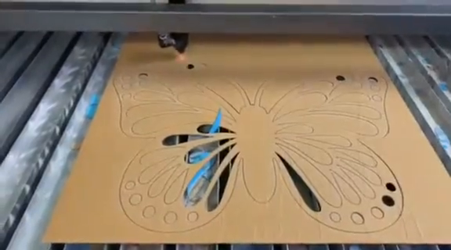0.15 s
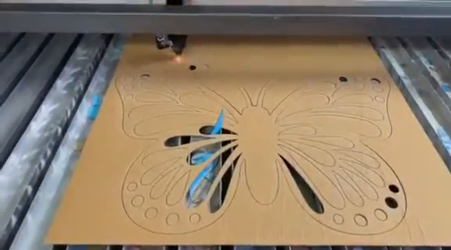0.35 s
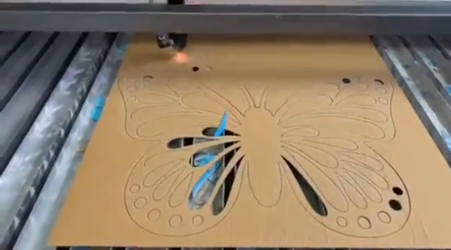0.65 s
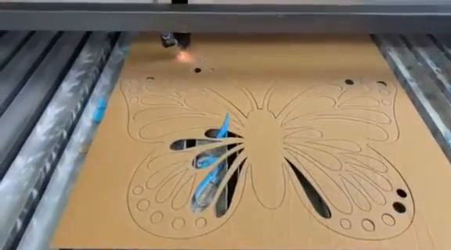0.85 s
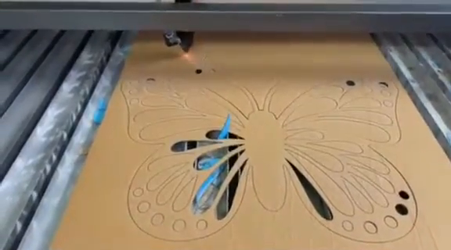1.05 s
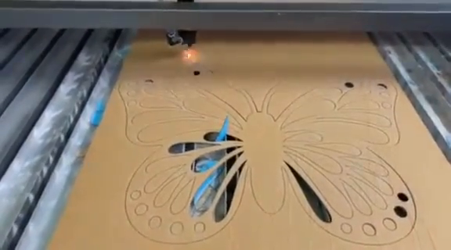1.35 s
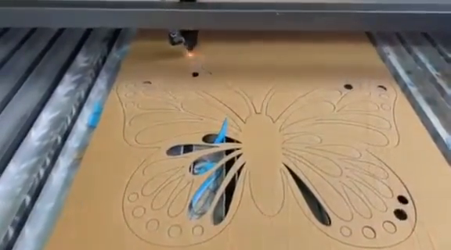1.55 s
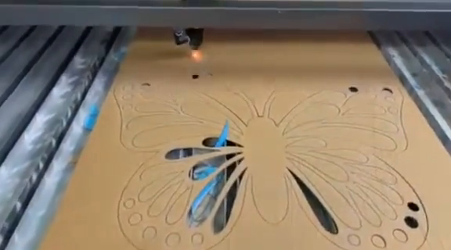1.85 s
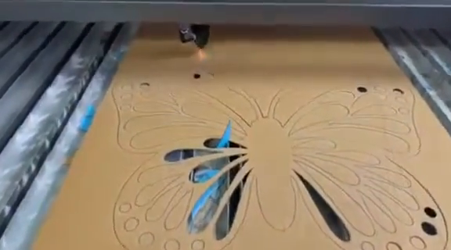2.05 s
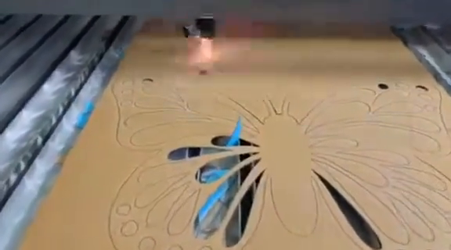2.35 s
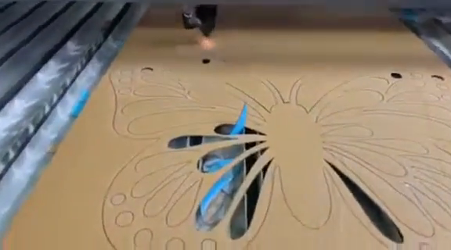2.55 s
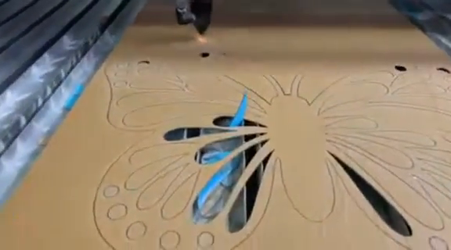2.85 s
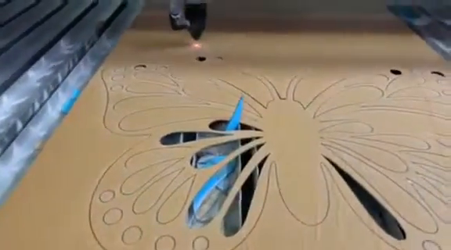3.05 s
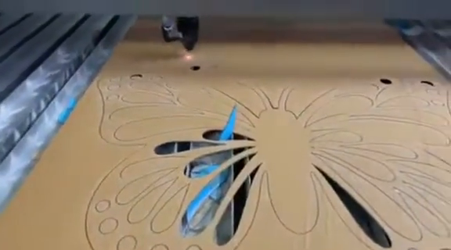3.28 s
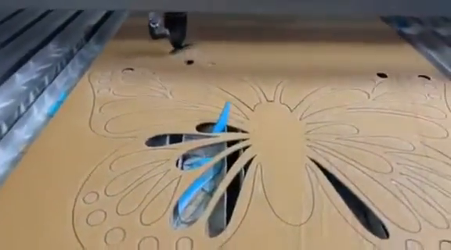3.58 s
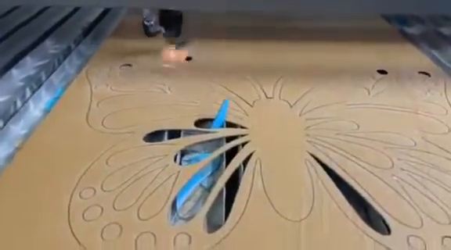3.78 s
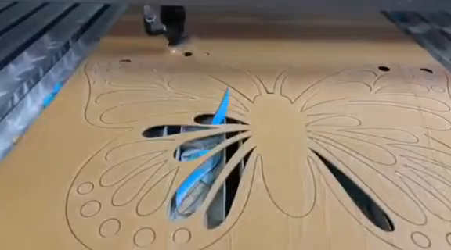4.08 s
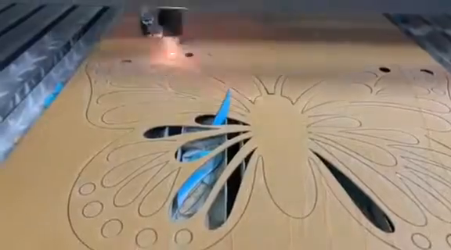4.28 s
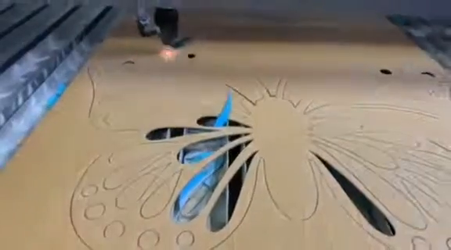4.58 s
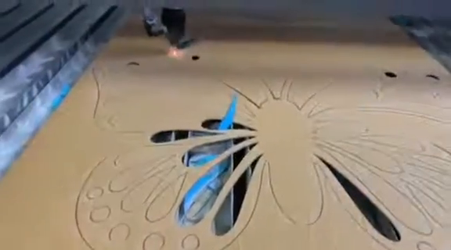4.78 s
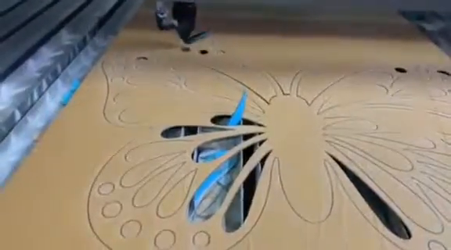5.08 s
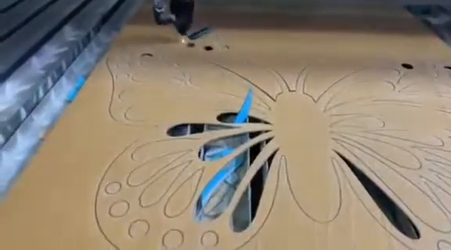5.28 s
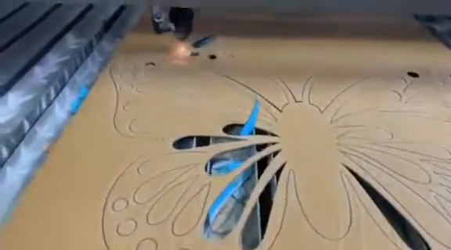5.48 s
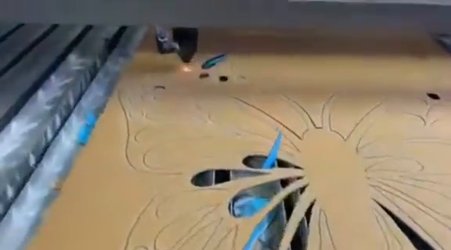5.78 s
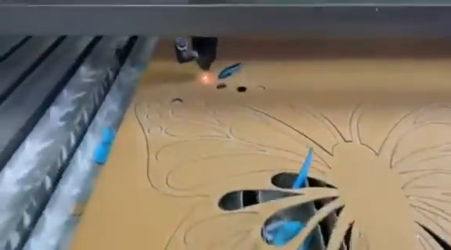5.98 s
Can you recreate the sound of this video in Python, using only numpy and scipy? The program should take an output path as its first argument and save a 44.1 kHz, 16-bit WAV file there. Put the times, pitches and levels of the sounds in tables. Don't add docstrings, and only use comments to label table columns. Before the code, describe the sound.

Steady workshop machine noise: fast pulsing pump drone, bright air-jet hiss with a few brief flares, and low lumpy fan rumble.

```python
import sys
import numpy as np
from scipy import signal
from scipy.fft import rfft, irfft
from scipy.io import wavfile
from scipy.ndimage import map_coordinates

SR = 44100
rng = np.random.default_rng(int(sys.argv[2]) if len(sys.argv) > 2 else 0)


def digitize_waveform(pressure):
    field = np.atleast_2d(pressure).T
    bounded = np.clip(field, -1, 1)
    quanta = np.round(bounded * 32767).astype(np.int16)
    wavfile.write(sys.argv[1], SR, quanta)


def invert_db(level):
    return 10 ** (np.asarray(level, dtype=float) / 20)


N = 270333


def rms_one(x):
    return x / np.sqrt(np.mean(x ** 2) + 1e-20)


def seconds():
    return np.arange(N) / SR


def in_time(rows):
    s, *columns = np.transpose(rows)
    return [np.interp(seconds(), s, column) for column in columns]


def drift(rate_hz):
    r = np.exp(-80 * np.pi * rate_hz / SR)
    slow = signal.lfilter([1], [1, -2 * r, r * r], rng.standard_normal(N // 40 + 2002))
    slow = slow[2000:]
    return np.interp(np.arange(N) / 40, np.arange(len(slow)), rms_one(slow - slow.mean()))


def resonate(x, hz, width_hz):
    r = np.exp(-np.pi * width_hz / SR)
    poles = [1, -2 * r * np.cos(2 * np.pi * hz / SR), r * r]
    return signal.lfilter([(1 - r * r) / 2, 0, (r * r - 1) / 2], poles, x)


def coloured(spectrum):
    hz, level_db = np.transpose(spectrum)
    bins = np.fft.rfftfreq(N, 1 / SR) + 1
    shape = invert_db(np.interp(np.log(bins), np.log(hz), level_db, left=-90, right=-90))
    return rms_one(irfft(rfft(rng.standard_normal(N)) * shape, N))


def patchy(x, low_hz, high_hz, count, fast_db, slow_db):
    edges = np.geomspace(low_hz, high_hz, count + 1)
    bins = np.fft.rfftfreq(N, 1 / SR)
    place = np.interp(np.log(bins + 1), np.log(edges), np.arange(count + 1))
    whole = rfft(x)
    out = np.zeros(N)
    for k in range(count + 1):
        band = irfft(whole * np.maximum(1 - abs(place - k), 0), N)
        out += band * invert_db(fast_db * drift(13) + slow_db * drift(0.81))
    return rms_one(out)


def surges(rows, half_s):
    now = seconds()
    return sum(gain_db * np.exp(-((now - s) / half_s) ** 2) for s, gain_db in rows)


# (middle [s], length [s])
MICROPHONE_MOVES = [
    (2.311, 0.44),
    (5.51, 0.23),
]


def places():
    now = seconds()
    first, second = (np.clip((now - s) / length_s + .5, 0, 1) for s, length_s in MICROPHONE_MOVES)
    return np.array([1 - first, np.maximum(first - second, 0), second])


# (frequency [Hz], level per Hz [dB])
RUMBLE_SPECTRUM = [(14, -20), (22, -11.5), (32, -9.5), (45, 0.5), (62, -3), (75, -9.5), (90, -29)]
# (level [dB], level [dB], level [dB])
RUMBLE_LEVELS = (-35, -31, -27.5)
# (time [s], gain [dB])
RUMBLE_SWELLS = [(.42, 9), (.85, 4.5), (2.01, 11), (3.0, 2), (3.66, 8), (4.02, 10), (4.5, 6.5), (5.0, 8.5),
                 (5.53, 8)]


def fan_rumble(shares):
    level_db = RUMBLE_LEVELS @ shares + surges(RUMBLE_SWELLS, half_s=.12)
    return invert_db(level_db - 1.0) * coloured(RUMBLE_SPECTRUM)


# (frequency [Hz], level per Hz [dB])
BOOM_SPECTRUM = [(50, -33.5), (70, -9.5), (95, 2.5), (130, -0.5), (170, -6.5), (260, -10), (340, -10.5)]
# (level [dB], level [dB], level [dB])
BOOM_LEVELS = (-26.5, -27, -30.5)
# (time [s], gain [dB])
BOOM_SWELLS = [(.01, 4.3), (.68, 2.6), (1.4, 2.6), (2.4, 4.4), (2.88, 6), (3.43, 4.8), (4.85, 3),
               (5.15, 4.4), (5.66, 5.4)]


def fan_boom(shares):
    level_db = BOOM_LEVELS @ shares + surges(BOOM_SWELLS, half_s=0.098)
    boom = patchy(coloured(BOOM_SPECTRUM), 66, 360, count=3, fast_db=1.0, slow_db=-3.5)
    return invert_db(level_db + 1.2) * boom


def fan_motor():
    motor_hz, level_db = 47.55, -33
    return invert_db(level_db) * np.sqrt(2) * np.sin(2 * np.pi * motor_hz * seconds())


# (frequency [Hz], level per Hz [dB])
RUSH_SPECTRUM = [(150, -10), (220, -5.5), (330, -8), (360, -11.5), (500, -3.5), (620, -4.5), (800, -8.5),
                 (950, -12.5), (1200, -12.5), (1750, -16.5), (2300, -22), (3500, -22)]
# (level [dB], level [dB], level [dB])
RUSH_LEVELS = (-28, -28, -26.5)
# (time [s], gain [dB])
PUFF = [(5.51, 5)]
# (frequency [Hz], width [Hz], rms level far, nearer, nearest [dB])
DUCT_TONES = [(300, 46, -9, -9, -10), (597, 36, -5, -5, -7), (838, 14, -14, -17, -16),
              (918, 22, -11, -13, -5), (1022, 32, -11, -9, -11), (1115, 36, -12, -13, -14),
              (1249, 8, -16, -14, -11), (1320, 7, -15, -10, -11), (1466, 12, -12, -18, -18),
              (1503, 6, -16, -9.5, -11), (1524, 10, -15, -16, -17), (1548, 10, -17, -18, -18),
              (1619, 6, -21, -20, -20), (1690, 9, -11, -13, -15), (1800, 30, -18, -18, -18),
              (1940, 40, -17, -17, -17)]


def fan_rush(shares):
    level_db = RUSH_LEVELS @ shares + surges(PUFF, half_s=.009)
    rush = invert_db(3.0) * patchy(coloured(RUSH_SPECTRUM), 220, 3000, count=6, fast_db=1.5, slow_db=1.93)
    for hz, width_hz, *place_db in DUCT_TONES:
        tone = resonate(rng.standard_normal(N), hz, 3 * width_hz)
        tone = resonate(tone, hz, width_hz)
        rush += invert_db(place_db @ shares - 1.53 + 1.1 * drift(0.79)) * rms_one(tone)
    return invert_db(level_db - 1.0) * rush


def fan():
    shares = places()
    return fan_rumble(shares) + fan_boom(shares) + fan_motor() + fan_rush(shares)


# (frequency [Hz], level per Hz [dB])
HISS_SPECTRUM = [(1100, -25), (1900, -3), (2300, -1.5), (5000, -1.5), (8700, 1), (9050, -2.5), (9350, -9),
                 (9700, -23), (10000, -65.5)]


def standing(bells):
    bins = np.fft.rfftfreq(N, 1 / SR)
    shape_db = sum(level_db / (1 + (2 * (bins - hz) / width_hz) ** 2) ** 2
                   for hz, width_hz, level_db in bells)
    return rms_one(irfft(rfft(coloured(HISS_SPECTRUM)) * invert_db(1.1 * shape_db), N))


# (delay [s], sway as the hand wavers [s], level [dB])
JET_ECHOES = [(.0031, .00005, -13), (.0053, .00006, -12), (.0087, .00007, -12), (.0131, .00008, -13)]


def echoed(air):
    now = np.arange(N)
    out = air
    for delay_s, sway_s, level_db in JET_ECHOES:
        at = (now - (delay_s + sway_s * drift(.7)) * SR) % (N - 1)
        out = out + invert_db(level_db) * map_coordinates(air, [at], order=3)
    return rms_one(out)


# (time [s], hold [s], gain [dB])
CUT_OUTS = [
    (3.502, .07, 5),
    (4.739, 0.033, 1),
    (5.012, .11, 6.5),
    (5.22, .05, 3),
]


def flares():
    attack_s, release_s = 0.035, .11
    now = seconds()
    gain = np.zeros(N)
    for s, hold_s, gain_db in CUT_OUTS:
        corners = np.cumsum([s, attack_s, abs(hold_s), release_s])
        gain += gain_db * np.interp(now, corners, [0, 1, 1, 0])
    return gain


# (frequency [Hz], width [Hz], level [dB])
FAR_WAVES = [(2240, 250, -5), (3660, 520, 3.5), (4080, 140, 6), (4670, 410, 1), (4960, 690, -0.5),
             (5130, 260, 6), (6263, 630, 11.5), (6550, 1310, -7.5), (7160, 380, 3), (7760, 140, 7),
             (7790, 140, 4), (8470, 1100, -3), (8750, 91, 1)]
NEARER_WAVES = [(2364, 460, -3.5), (3720, 720, 2.5), (3770, 260, -3), (4617, 570, -12), (4790, 1900, 11),
                (5000, 590, -10.5), (5760, 540, -4.5), (6200, 310, 2), (6750, 280, -2), (7710, 220, -7),
                (8060, 320, 1.5), (7970, 820, -2), (8460, 1100, -2)]
NEAREST_WAVES = [(2900, 370, -4.5), (4230, 1200, 3.5), (4600, 250, -7.5), (4930, 2700, 2.5),
                 (6080, 160, -4), (6560, 220, 2.5), (7020, 2100, -7), (7280, 350, 6), (7570, 110, 3.5),
                 (7900, 150, 4.5), (8740, 200, -4)]
# (frequency [Hz], width [Hz], level [dB])
HOLE_WAVES = [(2850, 310, -13.5), (3604, 920, 8), (4960, 88, -7.5), (5020, 660, -6), (5490, 2000, 7.5),
              (5700, 390, -15.5), (6820, 130, -6.5), (7600, 410, -3), (7950, 820, -5.5)]
# (time [s], level [dB])
JET_LEVEL = [(0, -30), (2.13, -28.5), (2.9, -27.5), (3.8, -28.5), (5.4, -28.5), (5.8, -24.5), (6.13, -27)]


def jet():
    waves = (FAR_WAVES, NEARER_WAVES, NEAREST_WAVES)
    cutting = sum(np.sqrt(share) * standing(bells) for share, bells in zip(places(), waves))
    flare_db = flares()
    hole = np.clip(0.5 * flare_db, 0, .9)
    air = np.sqrt(1 - hole) * cutting + np.sqrt(hole) * standing(HOLE_WAVES)
    hiss = patchy(echoed(air), 2000, 9500, count=12, fast_db=1.1, slow_db=0.99)
    level_db, = in_time(JET_LEVEL)
    return invert_db(level_db + flare_db) * hiss


def casing(modes, belt_db, scatter_db, belt_s, belt_rad):
    pump_turns_hz, belt_hz = 11.422, 4.33
    run_in = SR
    turns = np.arange(-12, 72)
    out = 0
    for point, hz, ring_hz, rise_hz, level_db in modes:
        s = (turns + point) / pump_turns_hz
        belt = 2 * np.pi * belt_hz * s + belt_rad
        at = ((s + belt_s * np.sin(belt)) * SR).round().astype(int) + run_in
        inside = (at >= 0) & (at < N + run_in)
        strength = invert_db(belt_db * np.cos(belt) + scatter_db * rng.standard_normal(len(s)))
        blows = np.full(N + run_in, 1e-18)
        blows[at[inside]] = strength[inside]
        ring = resonate(resonate(blows, hz, rise_hz), hz, ring_hz)
        out = out + invert_db(level_db) * rms_one(ring[run_in:])
    return out


# (point in the turn [0-1], frequency [Hz], ring width [Hz], rise width [Hz], rms level [dB])
LOW_CASING = [(.477, 283.3, 6.5, 90, -8), (.070, 318.5, 11, 27, -1), (.70, 160, 8, 20, -14),
              (.30, 240, 25, 40, -16), (.20, 400, 8, 20, -18), (.30, 424, 10, 30, -20)]
HIGH_CASING = [(.474, 494.7, 35, 53, -18), (.536, 514.9, 6.4, 90, -13.5), (.645, 609.8, 14, 47, -2),
               (.516, 647.6, 35, 90, -7.5), (.463, 686.6, 45, 65, -12), (.80, 703, 14, 30, -18),
               (.60, 755, 10, 30, -18), (.30, 856, 12, 30, -25), (.70, 1020, 25, 50, -24)]
# (time [s], low modes level [dB], high modes level [dB])
PUMP_LEVELS = [(0, -23.5, -18), (2, -24, -17), (2.8, -21, -19.5), (4.5, -21.5, -18), (6.13, -20.5, -19.5)]


def pump():
    low_db, high_db = in_time(PUMP_LEVELS)
    low = casing(LOW_CASING, belt_db=-0.6, scatter_db=1.08, belt_s=.00022, belt_rad=1.1)
    high = casing(HIGH_CASING, belt_db=0.65, scatter_db=0.37, belt_s=.00016, belt_rad=3.1)
    return invert_db(low_db) * low + invert_db(high_db) * high


def scene():
    return (fan() + jet() + pump())[None]


# (frequency [Hz], step [dB])
ROUNDING_STEP = [(1200, -14), (2200, 2.5), (4000, 3.5), (7000, 3.5), (9500, 3.5)]


def thinned(x, wander_db):
    hop = 1024
    n = np.arange(2 * hop) + .5
    k = np.arange(hop // 2) + .5
    window = np.sin(np.pi * n / (2 * hop))[:, None]
    basis = window * np.cos(np.pi / hop * np.outer(n + hop / 2, k)) * np.sqrt(2 / hop)
    blocks = np.pad(x, (hop, 2 * hop - N % hop)).reshape(-1, hop)
    lines = np.hstack([blocks[:-1], blocks[1:]]) @ basis
    hz = k * SR / (2 * hop)
    treble = lines[:, (hz > 2500) & (hz < 9000)]
    hiss = np.sqrt(np.mean(treble ** 2, axis=1, keepdims=True))
    step_db = np.interp(hz, *np.transpose(ROUNDING_STEP), left=-60)
    step = hiss * invert_db(step_db + wander_db * rng.standard_normal(hiss.shape)) + 1e-12
    rounded = np.sign(lines) * np.floor(abs(lines) / step + .4) * step
    frames = rounded @ basis.T
    return (frames[:-1, hop:] + frames[1:, :hop]).ravel()[:N]


def low_pass(x):
    return signal.sosfilt(signal.butter(12, 9710, fs=SR, output="sos"), x)


def record(dry):
    rounded = 1.3 * np.tanh(dry[0] / 1.3)
    mix = thinned(rounded, wander_db=1.26)[None]
    return low_pass(mix)


dry = scene()
out = record(dry)
digitize_waveform(out)
```